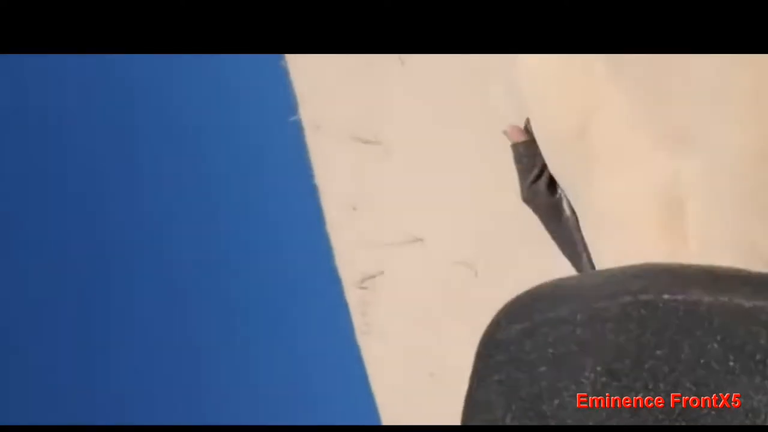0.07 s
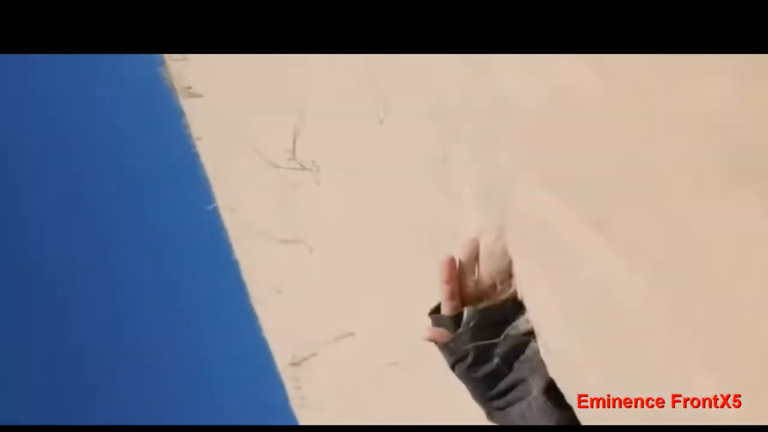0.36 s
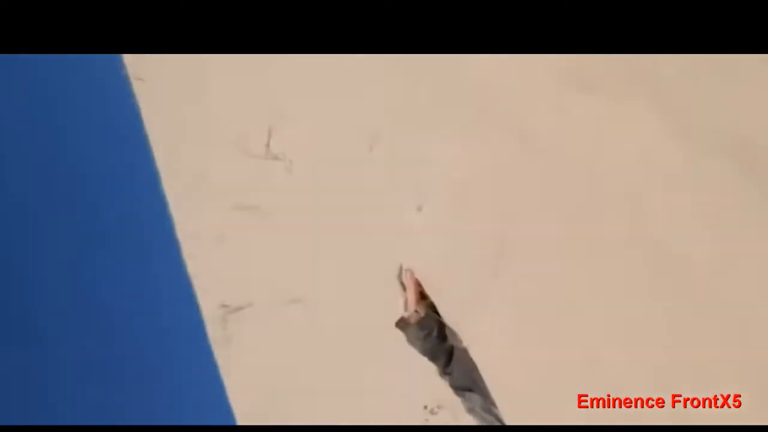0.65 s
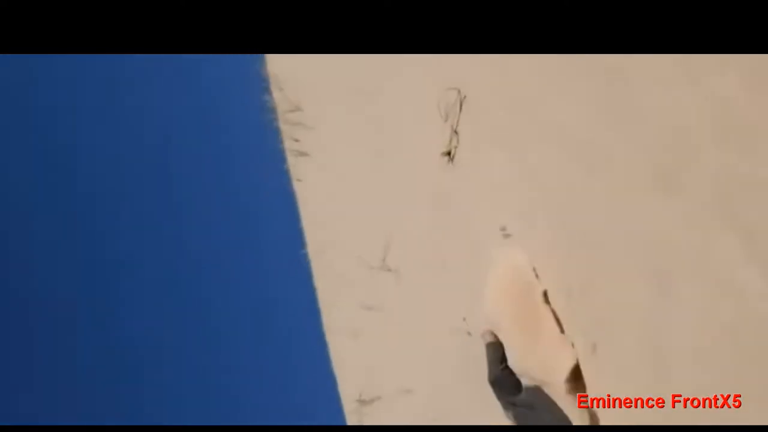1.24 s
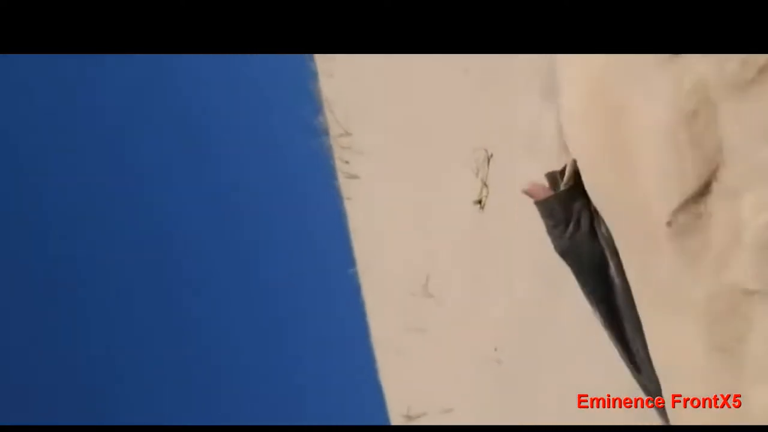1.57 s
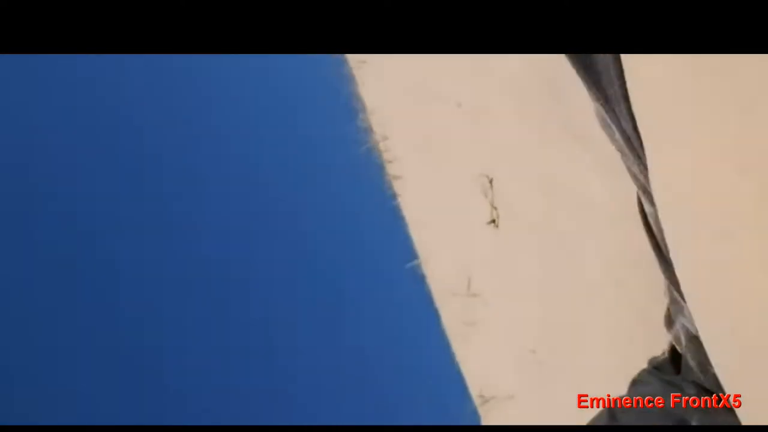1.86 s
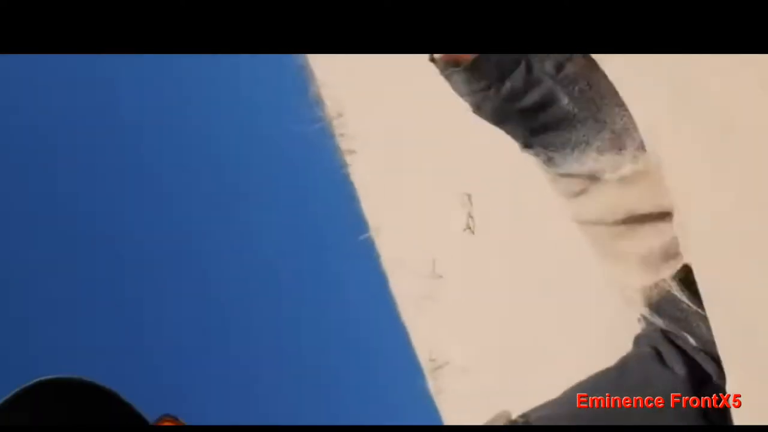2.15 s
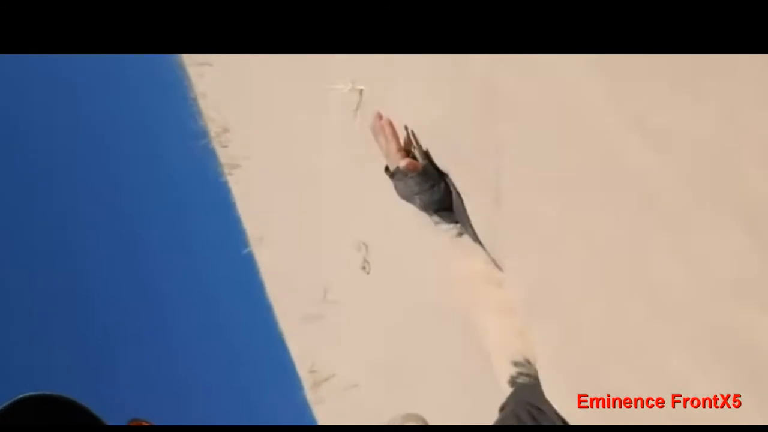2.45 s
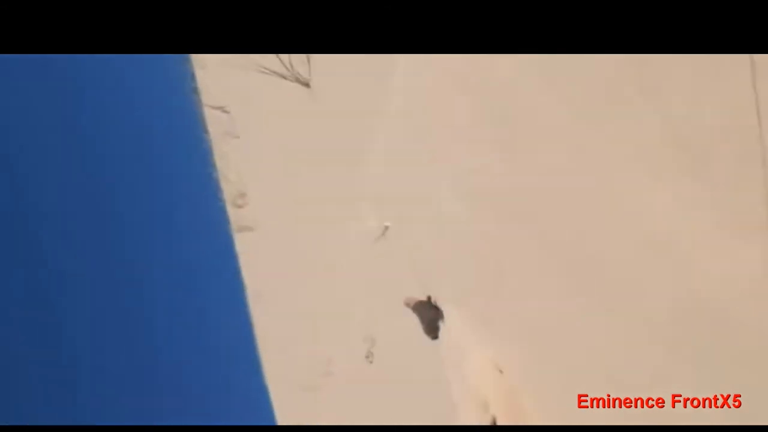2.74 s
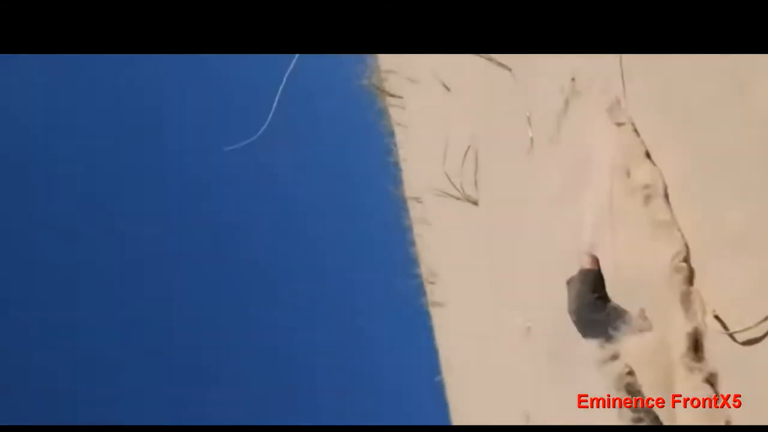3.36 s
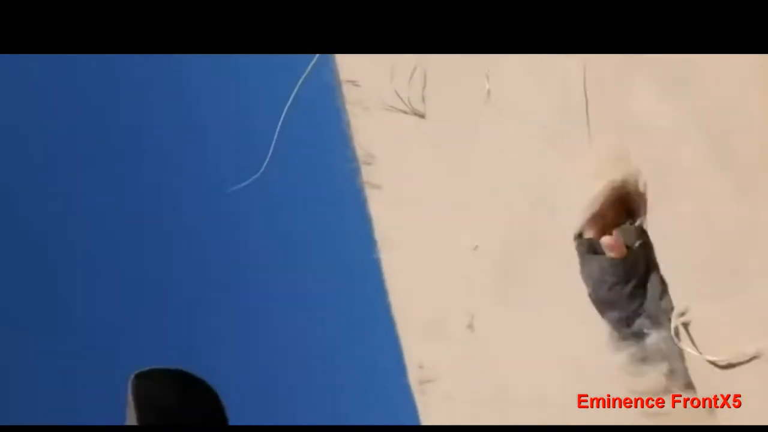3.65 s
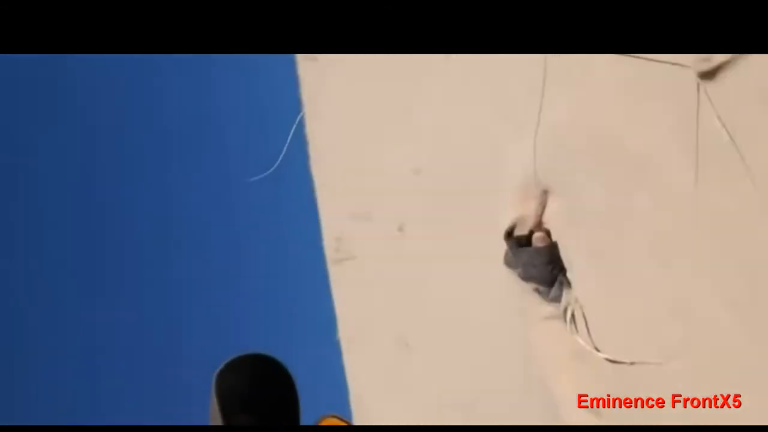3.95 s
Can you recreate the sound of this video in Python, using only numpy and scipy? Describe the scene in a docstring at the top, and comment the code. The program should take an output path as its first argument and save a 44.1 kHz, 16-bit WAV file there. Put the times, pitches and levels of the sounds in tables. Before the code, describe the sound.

Dune sand drones low and unevenly as a hand sweeps through it, with thuds and crackle.

```python
"""A low, surging drone near 116 Hz over a deep rumble: a hand sweeps through a booming dune's dry sand.
The sliding layer slips in step, which makes the note. Quick shoves raise it or break it into a rough
croak. There are dull thuds, with sharp cracks and crackle as loud swings buffet the close microphone.
Loose grains hiss and spray, a few tick against the microphone, and the loudest peaks are softly clipped."""
import sys
import numpy as np
from scipy import signal
from scipy.fft import rfft, irfft, next_fast_len
from scipy.io import wavfile
from scipy.ndimage import map_coordinates

SR = 44100
rng = np.random.default_rng(int(sys.argv[2]) if len(sys.argv) > 2 else 0)


def bounce(signal):
    """Save signal as a 16-bit WAV file at the path given by the first command-line argument."""
    frames = np.transpose(np.atleast_2d(signal))
    limited = np.clip(frames, -1, 1)
    pcm = np.round(limited * 32767).astype(np.int16)
    wavfile.write(sys.argv[1], SR, pcm)


N = 4 * SR

# Levels are relative. A COLOUR table says how strong the low and high parts of a sound are.
# one surge for each slab of sand that lets go: t/s, length/s, note level/dB, overtone level/dB
SURGES = [(0, 0.11, -16, -38), (0.106, 0.16, -11.5, -16.5), (0.182, 0.24, -11, -20),
          (0.479, .35, -17, -19.5), (0.854, 0.069, -8.5, -13.5), (0.974, 0.17, -8.5, -12),
          (1.103, 0.1, -13.5, -15.5), (1.184, 0.069, -8, -13), (1.251, 0.042, -4.5, -19),
          (1.278, 0.078, -7.5, -11), (1.353, .11, -10.5, -13), (1.428, 0.11, -12, -21.5),
          (1.509, 0.12, -9, -13.5), (1.633, 0.23, -10, -16.5), (1.853, 0.42, -8.5, -16),
          (2.043, 0.21, -6, -15), (2.229, 0.18, -17.5, -13.5), (2.585, 0.185, -17.5, -19.5),
          (2.861, 0.36, -11.5, -21.5), (3.2, 0.099, -9.5, -25.5), (3.323, 0.25, -9, -22),
          (3.568, 0.17, -9.5, -21), (3.797, 0.19, -12.5, -22)]
# how often the layer slips, heard as pitch: t/s, f/Hz
PITCH = [(0, 113.3), (.09, 121.7), (.2, 117), (.53, 112.1), (.62, 121.6), (.73, 116.1), (.8, 131),
         (.9, 111.5), (.97, 118.1), (1.07, 111.9), (1.15, 118.3), (1.22, 112.9), (1.32, 118.3),
         (1.44, 112.7), (1.5, 118.7), (1.57, 106.6), (1.65, 117), (1.83, 112.8), (1.9, 117.8), (2.0, 115),
         (2.22, 116.5), (2.25, 130.3), (2.3, 137.9), (2.38, 133.6), (2.52, 113.5), (2.75, 118),
         (2.9, 111.6), (3.02, 122), (3.15, 125.5), (3.23, 114.6), (3.33, 112.9), (3.41, 123.8), (3.52, 116),
         (3.6, 107), (3.68, 116.5), (4, 122.5)]
# harmonics 2 to 5, added to a surge's overtone level: level/dB
OVERTONES = [-0.5, -11, -21.5, -29.5]
# higher notes from quick shoves: t/s, length/s, first f/Hz, last f/Hz, level/dB
CROAKS = [(0.568, .15, 129.3, 200.1, -16.5), (2.397, 0.18, 174, 169.3, -16.5),
          (2.499, 0.078, 160, 195.3, -9.5), (2.597, 0.13, 201.6, 164.5, -19),
          (3.74, .2, 223.3, 205.4, -15.5)]
# force of the churning hand: t/s, level/dB
HAND_FORCE = [(0, -30), (0.09, -30), (0.17, -22), (0.28, -24), (0.39, -26.5), (0.46, -23), (0.6, -23),
              (0.7, -25), (0.74, -31.5), (0.87, -27.5), (0.95, -29.5), (1.05, -28), (1.3, -30.5),
              (1.55, -33), (1.76, -30), (1.86, -35.5), (2.29, -33), (2.39, -27.5), (2.48, -27.5),
              (2.54, -21), (2.6, -30.5), (2.68, -29.5), (2.86, -31.5), (3.0, -30.5), (3.14, -33.5),
              (3.38, -29.5), (3.56, -38.5), (3.7, -24.5), (3.8, -21.5), (4.0, -32)]
# its dull rubbing: f/Hz, level/dB
CHURN_COLOUR = [(25, -16), (50, -21), (75, -17), (130, 4), (175, 0), (225, 0.5), (300, -1.5), (450, -7),
                (700, -15), (1000, -24.5), (2000, -42.5), (4000, -59), (12000, -75.5)]
# rumble of the sand bed as the hand digs in: t/s, level/dB
BED_LEVEL = [(0, -13), (0.12, -27), (0.22, -15.5), (0.35, -15), (0.46, -24.5), (0.62, -19), (0.8, -14.5),
             (0.92, -35), (1.5, -35), (2.1, -32), (2.32, -40), (2.45, -20), (2.7, -16), (2.93, -17),
             (3.08, -36.5), (3.5, -28), (3.78, -16), (4.0, -13)]
# that rumble and its rattle: f/Hz, level/dB
BED_COLOUR = [(20, -33.5), (52, -24), (66, -6), (77, -8), (88, 1), (110, -9.5), (200, -47), (600, -77)]
RATTLE_COLOUR = [(60, -26), (130, -9), (200, 5), (260, -1), (420, -12.5), (800, -33), (3000, -68)]
# buffets on the microphone: t/s, thud level/dB, crack level/dB, crack f/Hz
BUFFETS = [(0.158, -9.5, -31, 1200), (0.251, -2.5, -27.5, 1000), (0.265, -7.5, -17.5, 1200),
           (0.277, -4.5, -13, 1500), (0.317, -10.5, -21.5, 2800), (0.522, -6, -20, 1300),
           (0.561, -7.5, -12, 1300), (0.57, -5, -20.5, 1800), (0.685, -8, -12.5, 2000),
           (0.749, -9.5, -24, 1200), (0.787, -14, -18, 1200), (0.822, -10, -15, 1400),
           (0.865, -11.5, -27, 1300), (0.961, -14.5, -11.5, 1480), (2.646, -13, -25, 1500),
           (2.926, -30, -14.5, 2200), (2.992, -13.5, -28, 1200), (3.379, -12.5, -18, 2300),
           (3.915, -9, -13, 2400), (3.956, -6, -14.5, 1800)]
# their thuds and cracks: f/Hz, level/dB
THUD_COLOUR = [(50, -14.5), (250, -1), (600, 6.5), (900, -2.5), (1400, -13.5), (2500, -51), (8000, -80)]
CRACK_COLOUR = [(200, -6.5), (1000, 3), (3000, -7), (6000, -10), (14000, -26.5)]
# moments of louder crackling: t/s, length/s, added level/dB
FLURRIES = [(0.232, .14, 6), (0.989, 0.11, 6), (2.004, .2, 8)]
# one click of the crackle: f/Hz, level/dB
CRACKLE_COLOUR = [(300, -12), (900, 4.5), (1700, -1.5), (3000, -16), (7000, -32.5)]
# loose grains running: t/s, level/dB
HISS_LEVEL = [(0, -58), (.12, -55), (.36, -61.5), (.59, -54), (.8, -59.5), (1.1, -61), (1.22, -57.5),
              (1.5, -63.5), (1.9, -57.5), (2.2, -58), (2.48, -54.5), (2.75, -59), (2.95, -54), (3.12, -57),
              (3.45, -56), (4, -54)]
# fine spray thrown near the microphone: t/s, length/s, level/dB
SPRAYS = [(2.277, .385, -57), (3.411, .11, -52.5), (3.457, 0.43, -55.5)]
# the hiss and the brighter spray: f/Hz, level/dB
HISS_COLOUR = [(200, -8), (1500, 11), (2500, 5), (4500, 1), (7000, -2), (10000, -4), (11500, -10.5),
               (15500, -11.5)]
SPRAY_COLOUR = [(4000, -16), (9000, 0.5), (11500, -2.5), (14000, 0), (16000, -2)]
# single grains hitting the microphone: t/s, peak level/dB
TICKS = [(0.8081, -16), (2.0586, -17.5), (2.6319, -16)]
# one such tick: f/Hz, level/dB
TICK_COLOUR = [(100, -9.5), (1500, 1.5), (4000, 3.5), (9000, -3), (15500, -6.5)]

PITCH_JITTER, SHIMMER_DB, NOTE_FLOOR_DB = 0.02585, 1.33, -24
CHURN_GAIN_DB, SLIPS_PER_S, SLIP_SHARE = 10, 240, 0.48
CRACKLE_CHANCES_PER_S, CRACKLE_GAIN_DB = 720, -27.5
CRACK_RING_S = 0.0031  # time to fade by 60 dB
HISS_GAIN_DB, RASP_DB = 5.5, 2
CLIP_HARDNESS, TOP_HZ = 10, 15700


def drone(phase, roughness):
    """The sand layer slips in step, surge after surge, making a note and its overtones."""
    shapes = np.array([swell(start, length) for start, length, *_ in SURGES])
    note, upper = (np.max(shapes * amp(db)[:, None], axis=0) for db in np.transpose(SURGES)[2:])
    note = np.maximum(note, amp(NOTE_FLOOR_DB))  # lingers between surges
    overtones = sum(amp(db + 1.6 * wobble(18)) * np.cos(k * phase + 0.56 * roughness * wobble(45))
                    for k, db in enumerate(OVERTONES, 2))
    shimmer = amp(SHIMMER_DB * roughness * wobble(90) + 0.9 * wobble(24))
    return np.sqrt(2) * (note * np.cos(phase) + upper * overtones) * shimmer


def croaks():
    """A quick shove makes a patch of sand sing higher for a moment."""
    out = np.zeros(N)
    for start, length, first_hz, last_hz, db in CROAKS:
        hz = curve([(start, first_hz), (start + length, last_hz)]) * (1 + 0.036 * wobble(90))
        phase = 2 * np.pi * np.cumsum(hz) / SR
        tone = sum(amp(-7.5 * k) * np.cos((k + 1) * phase) for k in range(4))  # each 7.5 dB softer
        out += amp(db) * swell(start, length) * unit(tone)
    return out


def churn(phase):
    """Sand slipping out of step gives dull, uneven pulses over rubbing that throbs with the drone."""
    chance, size, rub = rng.random(N), rng.standard_normal(N), rng.standard_normal(N)
    slips = (chance < SLIPS_PER_S / SR) * amp(2 * np.clip(size, -2, 2))
    rubbing = unit(rub * (1 + 0.59 * np.cos(phase)))
    force = np.sqrt(SLIP_SHARE) * unit(slips - slips.mean()) + np.sqrt(1 - SLIP_SHARE) * rubbing
    return amp(curve(HAND_FORCE) + CHURN_GAIN_DB) * unit(coloured(force, CHURN_COLOUR))


def sand_bed():
    """The bed rumbles below the note when the hand digs in, and rattles at the top of each swing."""
    limited = np.tanh(2 * noise(BED_COLOUR))  # it can only swing so far
    swing = unit(coloured(limited, BED_COLOUR))
    rattle = unit(coloured(rng.standard_normal(N) * amp(6.3 * swing), RATTLE_COLOUR))
    return amp(curve(BED_LEVEL)) * (swing + amp(-3) * rattle)


def buffets():
    """Dull thuds at set times, each with a sharp crack as the microphone is buffeted."""
    t = np.arange(SR // 50) / SR
    cracks = np.zeros(N + len(t))
    for start, _, db, hz in BUFFETS:
        ring = amp(db - 60 * t / CRACK_RING_S) * np.sin(2 * np.pi * hz * t)
        cracks[round(start * SR):][:len(t)] += ring
    thuds = clicks([row[:2] for row in BUFFETS], THUD_COLOUR)
    return thuds + coloured(cracks[:N], CRACK_COLOUR)


def crackle(swing, force_db):
    """Big swings buffet the microphone: random clicks, louder under a hard push and in flurries."""
    chance, size = rng.random(N), rng.standard_normal(N)
    sign = np.sign(rng.standard_normal(N))
    strength = amp(2.5 * np.clip(size, -2, 1)) * np.clip(swing, 0, 0.8) ** 2
    cracks = (chance < CRACKLE_CHANCES_PER_S / SR) * sign * strength
    flurry_db = sum(db * swell(start, length) for start, length, db in FLURRIES)
    gain = amp(CRACKLE_GAIN_DB + 0.55 * force_db + flurry_db)
    pulse_peak = np.abs(coloured(signal.unit_impulse(N), CRACKLE_COLOUR)).max()
    return gain * coloured(cracks, CRACKLE_COLOUR) / pulse_peak


def loose_grains(swing):
    """Running grains hiss, rasping in time with the sand's swing; finer spray flies in short bursts."""
    hiss_db = curve(HISS_LEVEL) + HISS_GAIN_DB + 1.4 * wobble(12) + RASP_DB * np.clip(swing, -1, 1)
    hiss = amp(hiss_db) * noise(HISS_COLOUR)
    bursts = sum(amp(db) * swell(start, length, ramp_s=0.06) for start, length, db in SPRAYS)
    spray = bursts * amp(1.5 * wobble(23)) * noise(SPRAY_COLOUR)
    return hiss + spray


def grain_ticks():
    """Single grains tick as they hit the microphone."""
    return clicks(TICKS, TICK_COLOUR)


def clicks(rows, colour):
    """One short pulse for each row of t/s, peak level/dB."""
    pulse = coloured(signal.unit_impulse(N), colour)[:SR // 20]
    hits = np.zeros(N)
    for start, db in rows:
        hits[round(start * SR)] = amp(db)
    return signal.fftconvolve(hits, pulse / np.abs(pulse).max())[:N]


def amp(db):
    """Turn decibels into a number to multiply by."""
    return 10 ** (np.asarray(db) / 20)


def unit(x):
    """Scale to an average power of 1."""
    return x / np.sqrt(np.mean(x ** 2) + 1e-20)


def curve(rows):
    """Join points of t/s, value with straight lines."""
    return np.interp(np.arange(N) / SR, *np.transpose(rows))


def wobble(rate):
    """A smooth curve through `rate` random points a second."""
    return map_coordinates(rng.standard_normal(int(N * rate / SR) + 4), [np.arange(N) * rate / SR])


def swell(start, length, ramp_s=0.048):
    """Fade in, hold and fade out."""
    t = np.arange(N) / SR - start
    return np.sin(np.pi / 2 * np.clip(np.minimum(t, length - t) / ramp_s, 0, 1))


def coloured(x, colour):
    """Filter x with a colour table."""
    size = 2 * next_fast_len(N // 2 + 8192)
    hz, db = np.transpose(colour)
    gain = amp(np.interp(np.log(np.fft.rfftfreq(size, 1 / SR) + 1), np.log(hz), db))
    cepstrum = irfft(np.log(gain))
    # fold it so that the filter rings after a hit, never before
    cepstrum[1:size // 2] *= 2
    cepstrum[size // 2 + 1:] = 0
    return irfft(rfft(x, size) * np.exp(rfft(cepstrum)), size)[:N]


def noise(colour):
    """Steady noise shaped by a colour table."""
    return unit(coloured(rng.standard_normal(N), colour))


def scene():
    """The harder and deeper the hand churns, the rougher the drone; big swings set off crackle."""
    force_db, depth_db = (level - level.mean() for level in (curve(HAND_FORCE), curve(BED_LEVEL)))
    roughness = amp(0.3 * (force_db + depth_db))
    hz = curve(PITCH) * (1 + PITCH_JITTER * roughness * wobble(70))
    phase = 2 * np.pi * np.cumsum(hz) / SR
    swing = drone(phase, roughness) + croaks() + churn(phase) + sand_bed()
    return (swing + buffets() + crackle(swing, force_db) + loose_grains(swing) + grain_ticks())[None]


def record(dry):
    """The loudest peaks are softly clipped, and nothing passes above TOP_HZ."""
    rounded = dry / (1 + np.abs(dry) ** CLIP_HARDNESS) ** (1 / CLIP_HARDNESS)
    size = next_fast_len(N + SR // 2)
    passes = np.fft.rfftfreq(size, 1 / SR) < TOP_HZ
    return irfft(rfft(rounded, size) * passes, size)[:, :N]


dry = scene()
out = record(dry)
bounce(out)
```